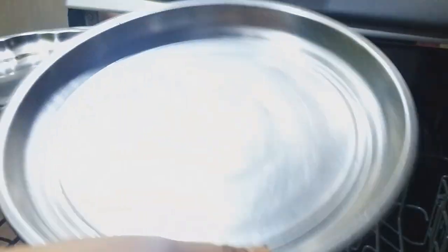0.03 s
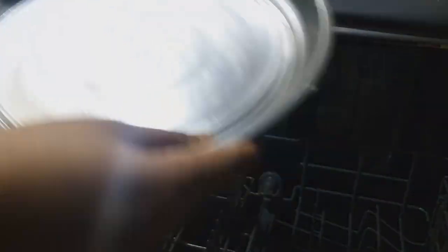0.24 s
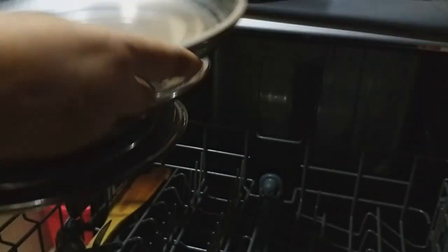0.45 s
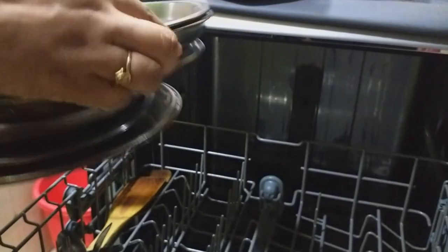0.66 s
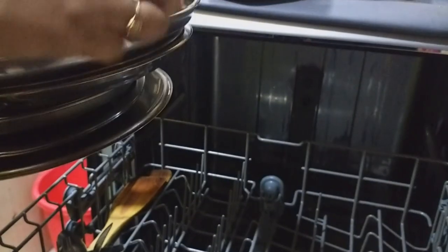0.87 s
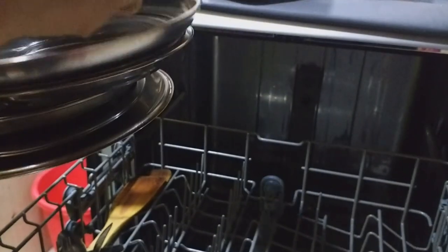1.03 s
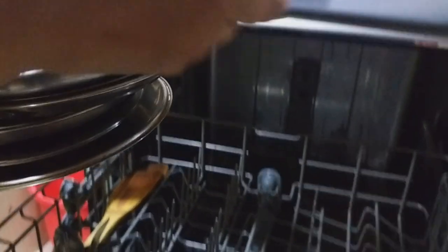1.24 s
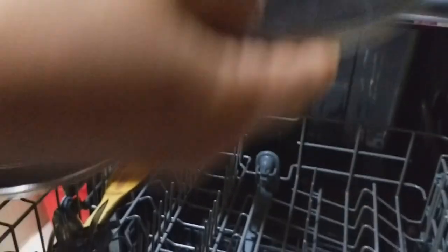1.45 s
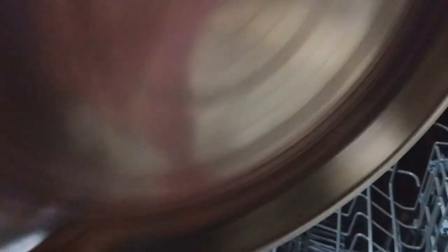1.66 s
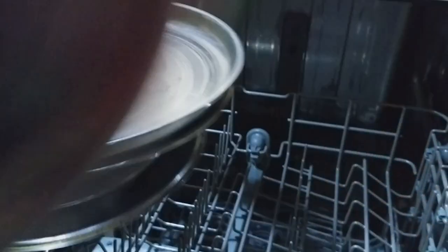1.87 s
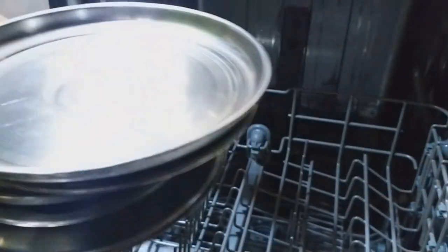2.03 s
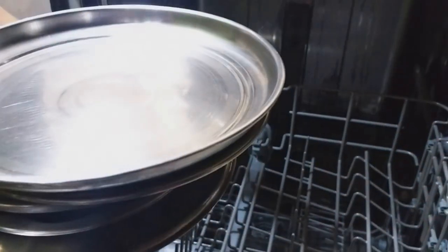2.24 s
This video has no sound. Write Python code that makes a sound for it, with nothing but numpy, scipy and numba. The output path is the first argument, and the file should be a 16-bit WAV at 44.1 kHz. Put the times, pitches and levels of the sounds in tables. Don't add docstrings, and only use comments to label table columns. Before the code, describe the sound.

A steel plate crashes onto a hand-held stack with a dense metallic clatter, settles with small rattles and rim ticks on a wire rack, then two plates knock and ring; close phone microphone in a small kitchen.

```python
import sys
import numpy as np
from scipy import signal
from scipy.io import wavfile
from scipy.ndimage import uniform_filter1d
from numba import njit

SR = 44100
rng = np.random.default_rng(int(sys.argv[2]) if len(sys.argv) > 2 else 0)


def undo_db(level):
    steps = np.asarray(level, float) / 20
    return 10 ** steps


def inscribe(sig):
    pcm = np.round(np.clip(np.atleast_2d(sig).T, -1, 1) * 32767)
    wavfile.write(sys.argv[1], SR, pcm.astype(np.int16))


N = 99225
OPPOSITE = np.array([[1], [-1]])
ATTACK_S = 0.0013
PILE_RADIATE_HZ = 400
PLATE_LAG_S, PLATE_PAN_DB = 0.0003826, 3


def shape(table, hz):
    points = np.array(table, float)
    return np.interp(np.log(hz), np.log(np.maximum(points[:, 0], 1)), points[:, 1])


def band(x, hz, width_hz):
    return signal.lfilter(*signal.iirpeak(hz, hz / width_hz, fs=SR), x)


def walk(rate):
    k = int(SR / rate)
    steps = np.repeat(rng.standard_normal(N // k + 1), k)
    return uniform_filter1d(uniform_filter1d(steps, k), k)[:N]


def chatter(hits):
    bounces_per_s, spread_db, blow = 3500, 2.5, 0.7
    t, force = np.arange(N) / SR, np.zeros(N)
    occurs = rng.random(N) < bounces_per_s / SR
    size_db = rng.exponential(size=N) * spread_db
    bounces = occurs * undo_db(size_db) * rng.choice([-1., 1.], N)
    for s, db, length, _ in hits:
        burst = bounces * np.exp(-np.abs(t - s) / max(length, 1e-4))
        burst = burst * np.clip((t - s) / ATTACK_S, 0, 1)
        burst[int(s * SR)] = blow
        force += undo_db(db) * burst / np.sqrt(np.sum(burst ** 2))
    latest_hit = np.searchsorted(np.array(hits)[:, 0], t + 1 / SR) - 1
    return force, np.maximum(latest_hit, 0)


def sheet(table, t60, count):
    hz = np.sort(100 + 15800 * rng.random(count) ** 1.5)
    db = shape(table, hz) + 10 * np.log10(hz) / 3
    decay = np.minimum(t60 * (hz / 2000) ** -.35, 1)
    return np.c_[hz, db, decay * undo_db(2 * rng.standard_normal(count))]


@njit
def ring(x, hit, gain, pole, ports):
    out = np.zeros((2, len(x)))
    start = np.argmax(x != 0)
    for m in range(pole.shape[1]):
        z = 0j
        for i in range(start, len(x)):
            z = z * pole[hit[i], m] + (x[i] + 1e-18) * gain[hit[i], m]
            out[0, i] += (z * ports[0, m]).imag
            out[1, i] += (z * ports[1, m]).imag
    return out


def steel(hits, parts, lag_s, pan_db, detune, cut_hz):
    scatter_db, port_spread = 3.0, 1
    force, hit = chatter(hits)
    leveled = []
    for modes, level_db in parts:
        modes = np.array(modes, float)
        power_db = 10 * np.log10(np.sum(undo_db(modes[:, 1]) ** 2))
        leveled.append(modes + [0, level_db - power_db, 0])
    hz, db, t60 = np.vstack(leveled).T
    chance = rng.standard_normal((len(hits), 2, len(hz)))
    tilt_db = np.array(hits)[:, 3:4] * np.log2(hz / 2000)
    gain = undo_db(db + tilt_db + scatter_db * chance[:, 0])
    turn = 2j * np.pi * hz * (1 + detune * chance[:, 1]) / SR
    pole = np.exp(turn - np.log(1000) / (np.maximum(t60, .005) * SR))
    half = np.pi * hz * lag_s
    half = half + port_spread * np.minimum(hz / 2000, 1) * rng.standard_normal(len(hz))
    ports = np.exp(1j * np.array([half, -half])) * undo_db(OPPOSITE * pan_db / 2)
    high_pass = signal.butter(4, cut_hz, "high", fs=SR, output="sos")
    return signal.sosfilt(high_pass, ring(force, hit, gain, pole, ports))


def held(hits, parts, detune, cut_hz=PILE_RADIATE_HZ):
    return steel(hits, parts, 0.0002, 2, detune, cut_hz)


def plain(hits):
    return [(*hit, 0) for hit in hits]


# (time [s], level [dB], contact length [s], brightness [dB/octave])
PILE_HITS = [(.067, -30, 0.03, 2.5), (.21, -18.5, 0.062, 1.35), (.243, -4.5, 0.015, 4.5),
             (.262, -5.5, 0.0099, 3.5), (.279, -8.5, 0.0095, 3), (.293, -7, 0.013, 1.8),
             (.312, -12, 0.027, 3), (.351, -17.5, 0.017, 0.4), (.391, -18.5, .018, -0.5),
             (.431, -23, 0.032, 0.5), (.492, -34, 0.038, 3.3), (.529, -26, 0.081, 2.1),
             (.579, -26, 0.033, 5.5), (.609, -29.5, .021, 2.8), (.657, -27.5, .03, 2.5),
             (.708, -30.5, .015, 5), (.738, -36, 0.029, 4.5), (.809, -31.5, 0.04, 2),
             (.896, -32.5, 0.045, 5.2), (1.017, -40, .012, 0.5)]
# (frequency [Hz], density [dB per Hz])
PILE_SHEET = [(120, -49.5), (200, -26.5), (465, -35), (579, -3), (883, -6.5), (2960, -3.5), (3250, -7),
              (3490, -7), (16000, -28.5)]


def pile():
    return held(PILE_HITS, [(sheet(PILE_SHEET, .14, count=480), -7)], detune=.012)


# (time [s], level [dB], contact length [s])
BODY_HITS = [
    (0.245, -21.5, 0.02),
    (0.275, -16.5, 0.015),
    (0.293, -19, 0.02),
    (.35, -26, .015),
]
# (frequency [Hz], level [dB], t60 [s])
PILE_LOW = [(563, .1, .3), (590, -.5, .32), (679, -5, .45), (713, -10, .3), (640, -9, .4), (974, -10, .3)]
# (time [s], level [dB], contact length [s])
SETTLE_HITS = [
    (.44, -34, 0.033),
    (0.578, -26.5, 0.0071),
    (.6, -23, 0.039),
    (0.64, -40, 0.09),
    (0.769, -42, 0.011),
    (0.813, -38, 0.02),
    (0.899, -32.5, 0.017),
]
# (frequency [Hz], level [dB], t60 [s])
SETTLED_LOW = [(545, -3, .2), (572, -4, .22), (600, -4, .15), (646, -3, .2), (705, -7, .22), (825, -10, .2),
               (883, -11, .22)]


def body():
    landing = held(plain(BODY_HITS), [(PILE_LOW, -4)], detune=.004)
    settling = held(plain(SETTLE_HITS), [(SETTLED_LOW, -4)], detune=.004)
    return landing + settling


# (time [s], level [dB], contact length [s], frequency [Hz], t60 [s])
PINGS = [(.246, 4.5, .009, 1581, 0.043), (.248, -6.5, .009, 2056, 0.067), (.262, -13.5, .01, 1283, 0.04),
         (.26, -46.5, 0.04, 206, 0.27), (.264, -13.5, .005, 5450, .06), (0.276, -21, .003, 2950, 0.04),
         (.292, -6.5, 0.0022, 3270, 0.044), (.295, -22.5, .01, 1464, 0.11), (.33, -36, .03, 1090, 0.18),
         (.43, -29, 0.027, 1743, 0.19), (.585, -67.5, 0.021, 215, 0.39), (.59, -32.5, .02, 980, 0.14),
         (.72, -43, 0.0075, 879, 0.32), (.9, -47, .008, 3470, .12), (.915, -39.5, 0.0088, 2293, .3),
         (1.2, -62, 0.00294, 2710, 0.077), (1.37, -61.5, 0.015, 2394, .3)]


def pings():
    out = 0
    for s, db, length, hz, t60 in PINGS:
        cut_hz = min(hz / 2, 120 + hz / 4)
        out = out + held(plain([(s, db, length)]), [([(hz, 0, t60)], 0)], 0, cut_hz)
    return out


# (time [s], level [dB], contact length [s], brightness [dB/octave])
CLANG_HITS = [
    (.263, -10.5, .01, 0.02),
    (.3, -20.5, 0.011, 0.02),
    (.327, -27, .005, .02),
]
# (frequency [Hz], level [dB], t60 [s])
CLANG = [(3115, -6, .14), (3171, .1, .2), (3225, -3, .15)]


def clang():
    return held(CLANG_HITS, [(CLANG, 4)], detune=0)


# (time [s], level [dB], contact length [s], brightness [dB/octave])
PLATE_HITS = [
    (1.842, -8, 0.0024, -0.26),
    (1.85, -10, 0.0021, 3.4),
    (1.856, -14.5, 0.0074, 0.4),
    (1.948, -14, 0.001, 1.5),
    (1.957, -18.5, 0.00245, 0.3),
]
# (frequency [Hz], level [dB], t60 [s])
RIMS = [(4797, -9, .12), (5609, -3, .1), (5862, -14, .2), (6971, 0, .09), (6250, -8, .08), (8290, -9, .09),
        (7400, -10, .1), (9442, -14, .12), (9889, -14, .11), (10820, -11, .08), (11370, -16, .18),
        (11980, -20, .18), (12460, -20, .16), (15700, -20, .15)]
# (frequency [Hz], density [dB per Hz])
PLATE_SHEET = [(59, -60), (100, -36.5), (600, -12.5), (1360, -24.5), (2170, 2), (2560, -8.5), (2750, -34.5),
               (6840, -19), (16000, -27)]


def knocks():
    parts = [(RIMS, -9), (sheet(PLATE_SHEET, 0.13, count=260), -3)]
    return steel(PLATE_HITS, parts, PLATE_LAG_S, PLATE_PAN_DB, detune=.0005, cut_hz=236.8)


def ringing(lines, t60s, t0, t1, db):
    knock_s, shimmer_db, shimmer_per_s = 1.8435, 2.4, 25
    twin_db, twin_split = -14, .012
    t, out = np.arange(N) / SR - knock_s, 0
    for (hz, line_db), t60 in zip(lines, t60s):
        fade = undo_db(-60 * np.maximum(t, 0) / t60) * np.clip(t / ATTACK_S, 0, 1)
        fade = fade / np.sqrt(np.mean(fade[int(t0 * SR):int(t1 * SR)] ** 2))
        fade = fade * undo_db(shimmer_db * walk(shimmer_per_s))
        turn = 2 * np.pi * (hz * t + rng.random())
        beat = np.cos(turn * twin_split * rng.random() + 2 * np.pi * rng.random())
        fade = fade * (1 + undo_db(twin_db) * beat)
        side = np.clip(np.tan(np.pi * hz * PLATE_LAG_S), -2, 2) * np.cos(turn)
        wave = np.sin(turn) * undo_db(OPPOSITE * PLATE_PAN_DB / 2) + side * OPPOSITE
        out = out + np.sqrt(2) * undo_db(line_db + db) * fade * wave
    return out


# low, middle and high free partials (frequency [Hz], rms level while ringing [dB]), each with t60 [s]
PLATE = [(323, -61), (522, -51), (705, -49), (845, -49.5), (877.5, -46), (1077, -43.5), (1260, -54),
         (1319, -52), (1513, -57), (1561, -43), (1863, -60), (2250, -62), (2476, -64), (2498, -65)]
PLATE_T60S = [2.5, 2, 2, 2.5, 1.2, 2.1, 1.2, 2.1, 1.2, 1.2, 1.2, 1, 1, 1.2]
DISH = [(2859, -47), (2883, -56), (2934, -54), (2955, -52), (3316, -46), (3370, -64), (3488, -57),
        (3806, -58), (3881, -60), (4005, -59), (4285, -56), (4344, -64), (4404, -59), (4764, -63)]
DISH_T60S = [2.5, 1.5, 1.3, 1.3, 1.5, 1, 1.3, 1.1, 1, 1.2, .8, 1, 1.2, .6]
LID = [(4953, -58), (5383, -68), (5464, -67), (5529, -59), (5997, -69), (6062, -62), (6595, -67),
       (6643, -66), (6751, -69), (7246, -70), (7321, -69), (7822, -73)]
LID_T60S = [1.1, .9, .8, .9, .8, .9, .7, .8, .6, .5, .5, .4]
GRIPPED = [(366, -52), (565, -35), (689, -42), (1287, -43), (1588, -28), (1858, -34), (2143, -35),
           (2240, -44), (2363, -37), (2519, -41)]
GRIPPED_T60S = [0.13, 0.81, .4, .4, 0.57, 0.98, 0.74, 0.52, .2, 0.86]


def free_plates():
    low = ringing(PLATE, PLATE_T60S, 1.98, 2.2, 0.24)
    middle = ringing(DISH, DISH_T60S, 1.98, 2.17, 0.54)
    high = ringing(LID, LID_T60S, 1.98, 2.15, 1.6)
    return low + middle + high + ringing(GRIPPED, GRIPPED_T60S, 1.86, 1.94, -3.14)


# (time [s], level [dB], contact length [s], brightness [dB/octave])
WIRE_HITS = [
    (0.0664, -30, 0.013, -3),
    (0.708, -27, 0.003, -2.1),
    (0.901, -34.5, 0.00061, 1.5),
    (1.198, -36.5, 0.004, -7),
    (1.349, -42, 0.01, 4),
]
# (frequency [Hz], level [dB], t60 [s])
WIRE = [(1924, 16.5, 0.1), (2939, -1.5, .06), (4300, -6, 0.02)]
# (frequency [Hz], density [dB per Hz])
WIRE_SHEET = [(590, -45.5), (1000, -33), (1940, -1.5), (2980, -2), (13000, -9.5), (16000, -25.5)]


def rack_wires():
    gripped = np.minimum(np.array(WIRE), [SR, SR, .08])
    parts = [(gripped, -10.5), (sheet(WIRE_SHEET, .06, count=160), 1.5)]
    return held(WIRE_HITS, parts, detune=.012)


# (time [s], level [dB])
THUMP = [
    (1.843, -64),
    (1.92, -73.5),
    (2.03, -46),
    (2.15, -54.5),
    (2.25, -56.5),
]


def thump():
    hz, width_hz = 223, 440
    x = band(band(rng.standard_normal(N), hz, width_hz), hz, width_hz)
    s, db = np.transpose(THUMP)
    level_db = np.interp(np.arange(N) / SR, s, db, left=-120)
    return x / x.std() * undo_db(level_db + 4.0 * walk(30))


# (time [s], level [dB])
SLIDE = [
    (1.45, -77),
    (1.632, -61),
    (1.82, -74.5),
]


def slide():
    x = np.array([band(rng.standard_normal(N), 6470, 9000) for _ in range(2)])
    s, db = np.transpose(SLIDE)
    level_db = np.interp(np.arange(N) / SR, s, db, left=-120, right=-120)
    return x / x.std() * undo_db(level_db + 2.9 * walk(68))


# (frequency [Hz], rms level [dB])
BOWL = [(705.2, -80), (861.3, -65)]
# (start [s], end [s])
BOWL_S = (0.96, 1.638)


def bowl():
    t, fade_s = np.arange(N) / SR, 0.067
    gate = np.clip(np.minimum(t - BOWL_S[0], BOWL_S[1] - t) / fade_s, 0, 1)
    hum = 0
    for hz, db in BOWL:
        hum = hum + np.sqrt(2) * undo_db(db + 1.8 * walk(13.43)) * np.sin(2 * np.pi * hz * t)
    return gate * hum


def room(x):
    t60_s, delay_s, top_hz, level_db = .33, .004, 3000, -17
    t = np.arange(SR // 2) / SR
    tail = rng.standard_normal((2, len(t))) * undo_db(-60 * t / t60_s) * (t > delay_s)
    tail = signal.lfilter(*signal.butter(1, top_hz, fs=SR), tail)
    tail = tail / np.sqrt(np.sum(tail ** 2) / 2)
    return undo_db(level_db) * signal.fftconvolve(x, tail, axes=1)[:, :N]


# (frequency [Hz], density [dB per Hz])
KITCHEN = [(18, -67), (30, -23), (319, -17.5), (684, -3.5), (801, -18.5), (866, -7.5), (1430, -20),
           (2750, -22), (16000, -37)]


def kitchen():
    swell_db, flicker_db, same_hz, level_db = 1.2, 1.5, 2470, -60
    out, swell = 0, walk(0.73)
    for hz in 35 * 2 ** np.arange(0, 9, .5):
        mid, side = (band(band(rng.standard_normal(N), hz, hz / 2), hz, hz / 2) for _ in range(2))
        db = shape(KITCHEN, hz) + swell_db * swell + flicker_db * walk(3)
        out = out + undo_db(db) * (mid + min(hz / same_hz, 1) * side * OPPOSITE)
    return out / np.mean(out, axis=0).std() * undo_db(level_db)


def scene():
    near = pile() + body() + pings() + clang() + knocks() + free_plates() + rack_wires()
    return near + room(near) + thump() + slide() + bowl() + kitchen()


def top_cut(x):
    return signal.sosfilt(signal.butter(12, 16960, fs=SR, output="sos"), x)


def record(dry):
    ceiling = .84
    low_pass = signal.ellip(8, .2, 18, 15800, fs=SR, output="sos")
    x = signal.sosfilt(low_pass, dry) / ceiling
    mix = ceiling * x / (1 + x ** 4) ** (1 / 4)
    return top_cut(mix)


dry = scene()
out = record(dry)
inscribe(out)
```